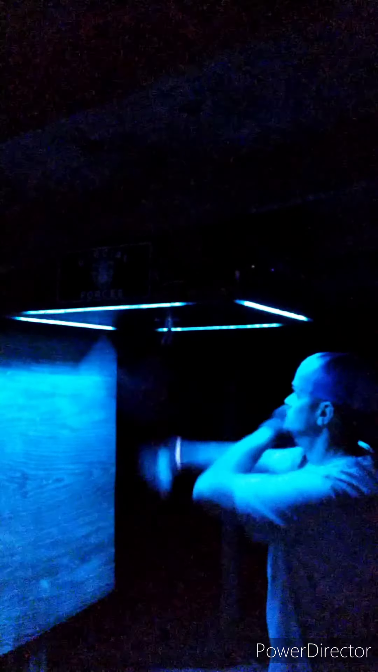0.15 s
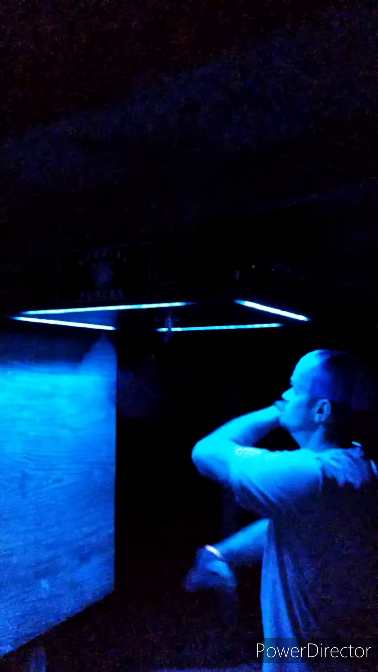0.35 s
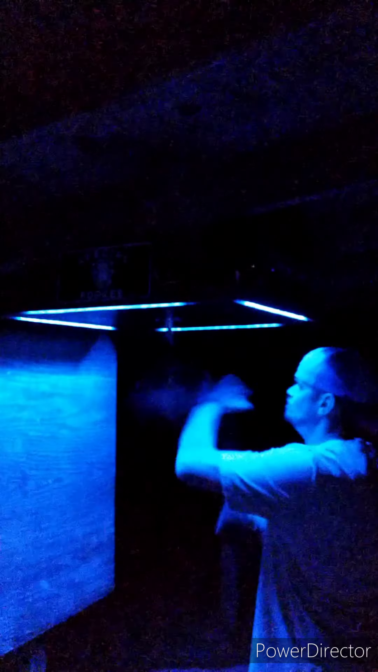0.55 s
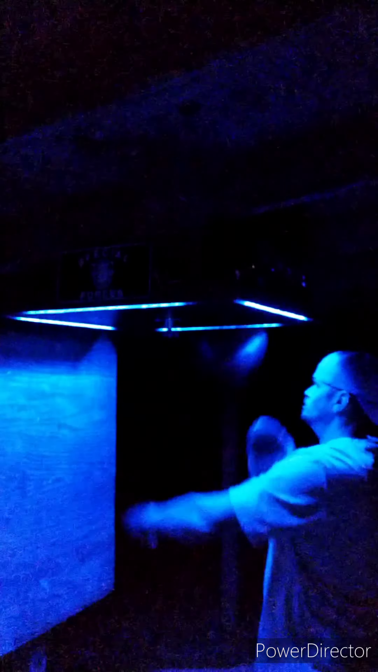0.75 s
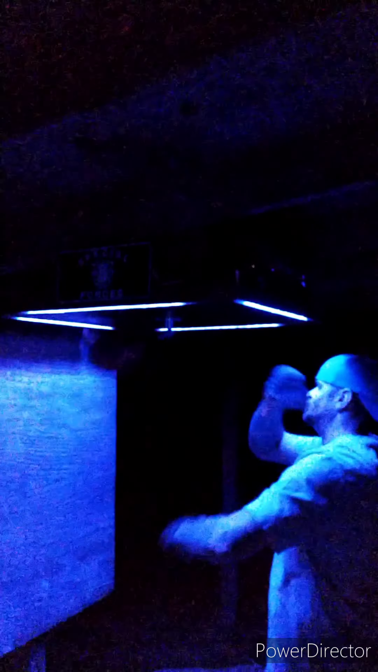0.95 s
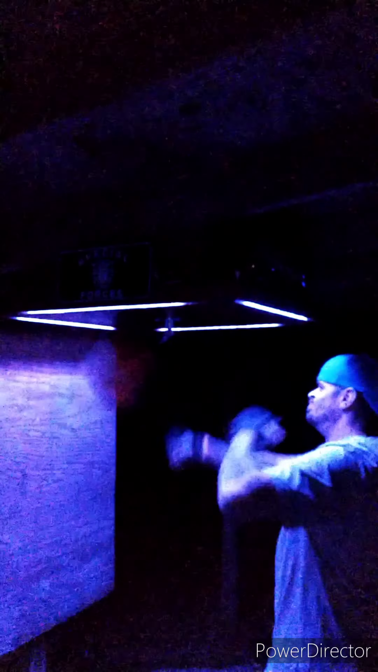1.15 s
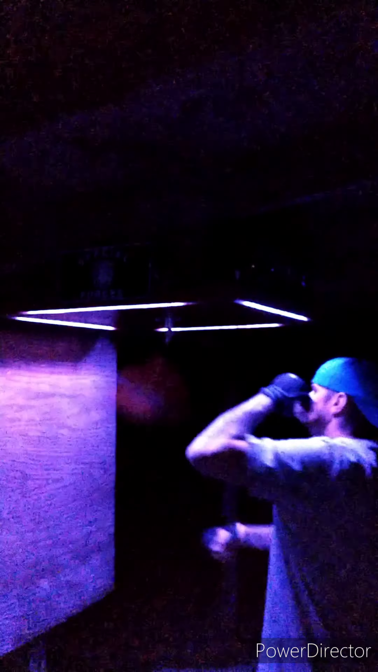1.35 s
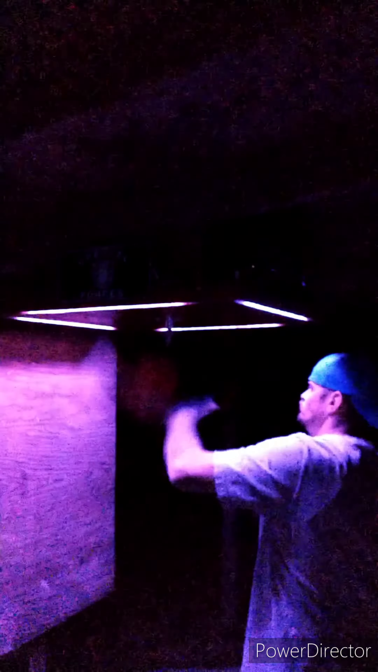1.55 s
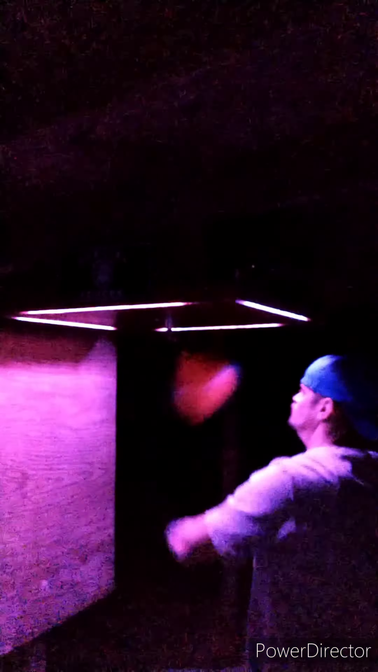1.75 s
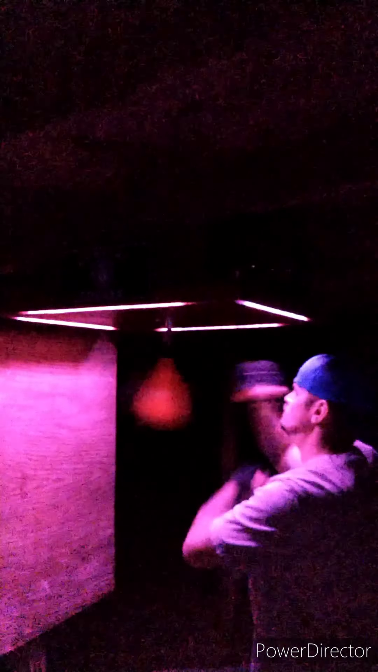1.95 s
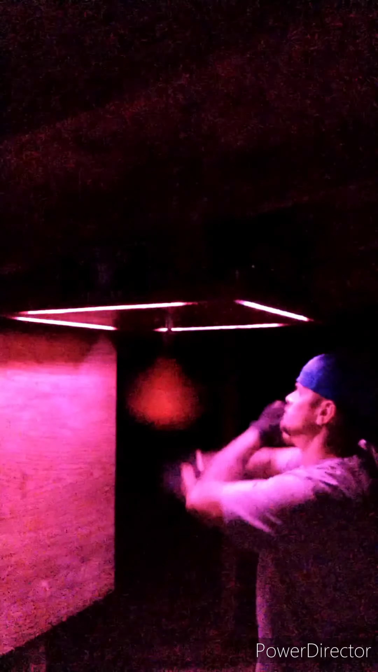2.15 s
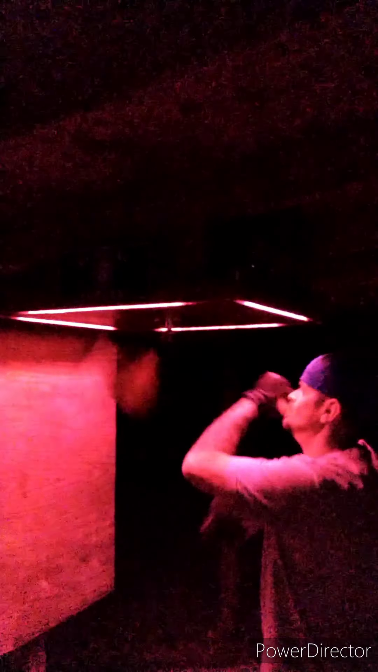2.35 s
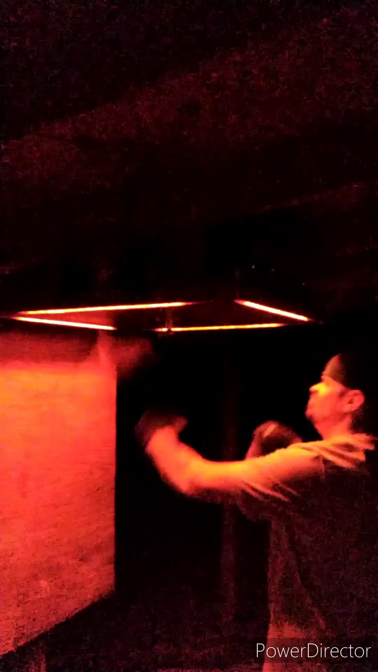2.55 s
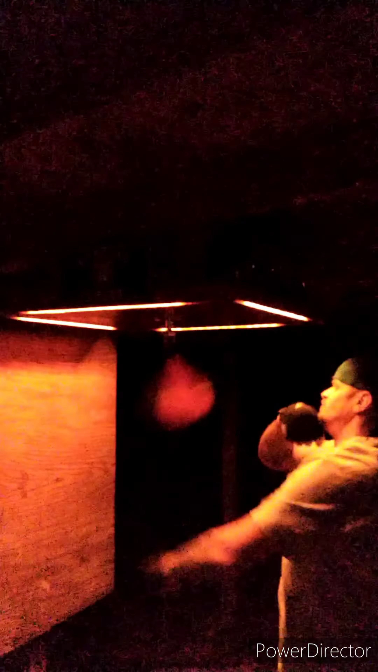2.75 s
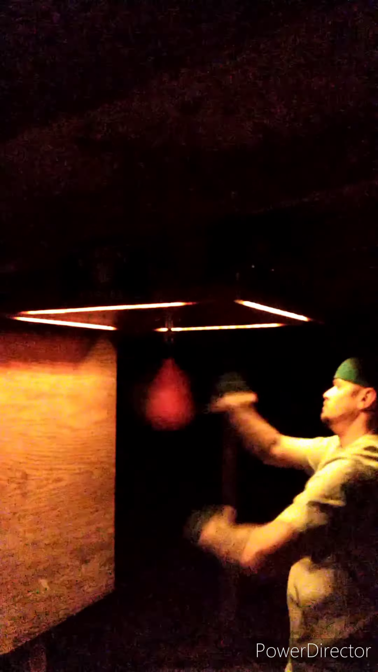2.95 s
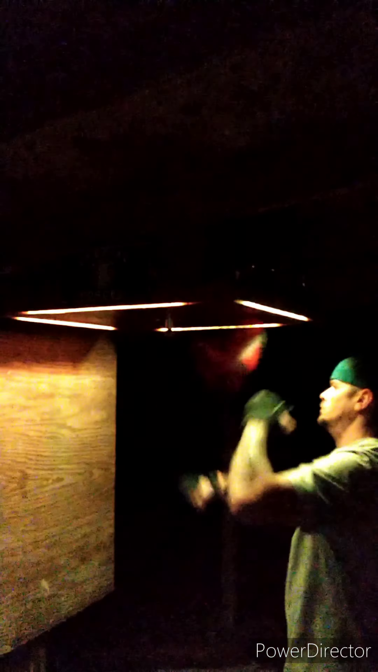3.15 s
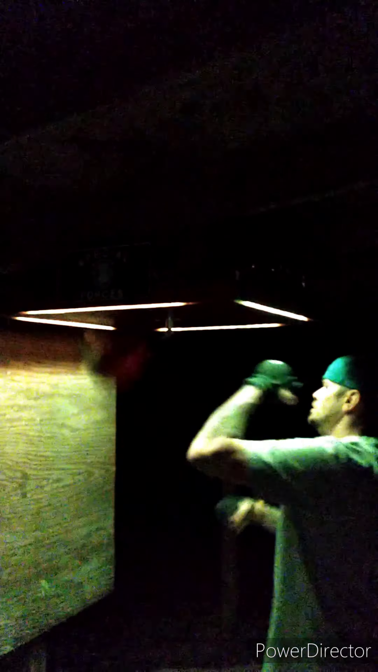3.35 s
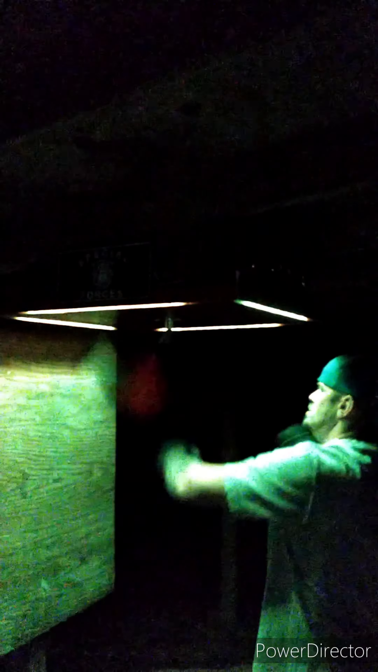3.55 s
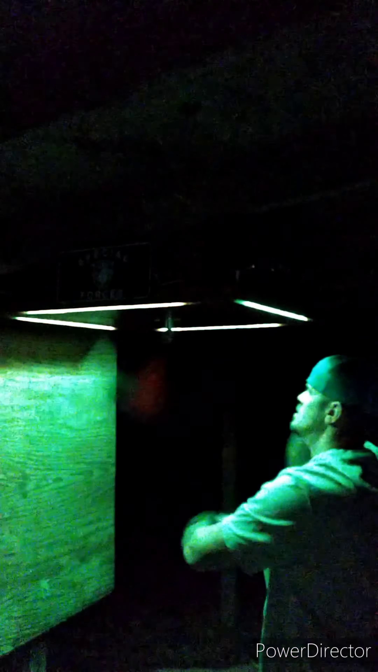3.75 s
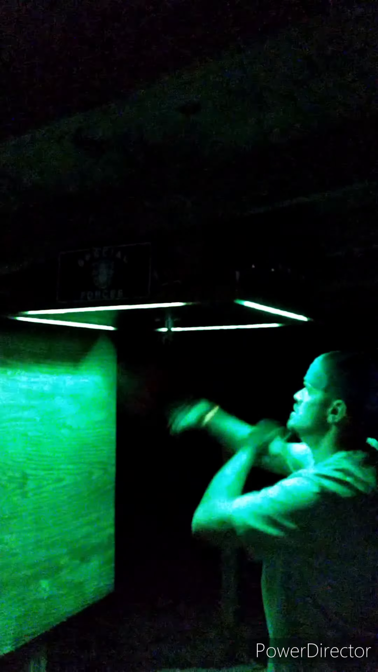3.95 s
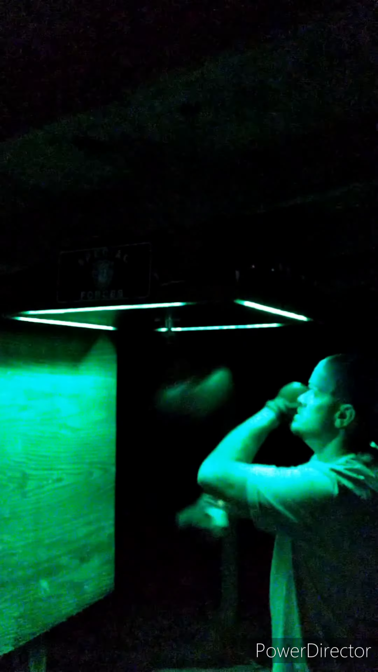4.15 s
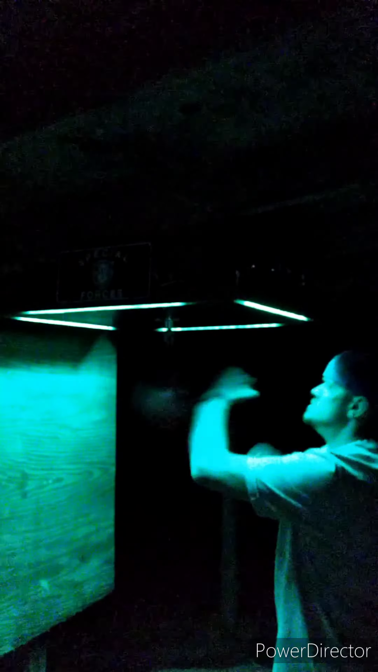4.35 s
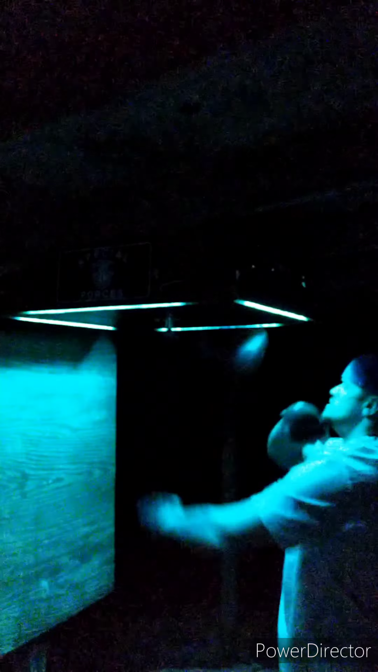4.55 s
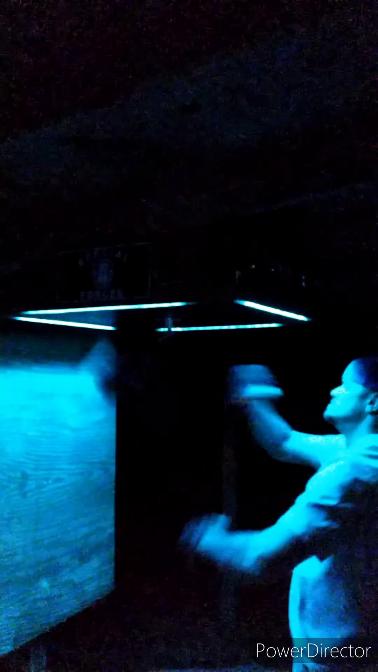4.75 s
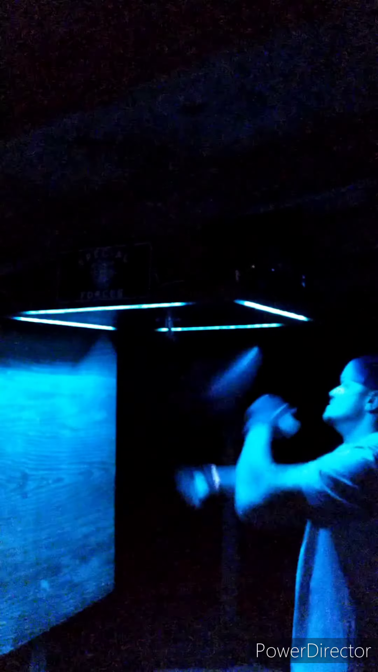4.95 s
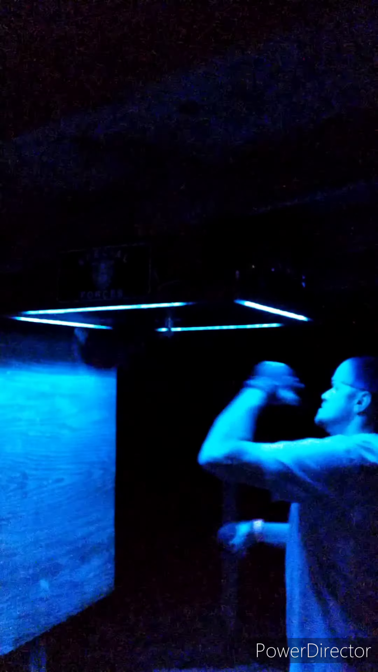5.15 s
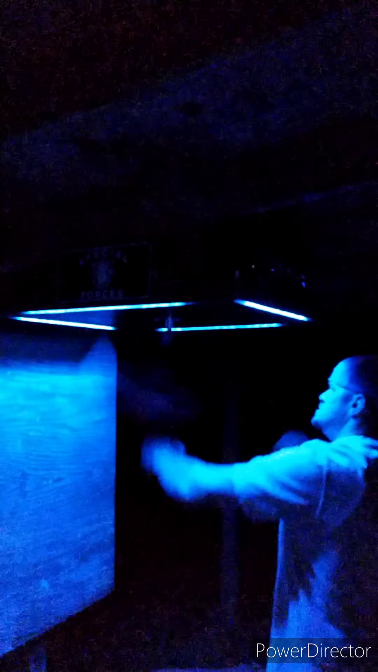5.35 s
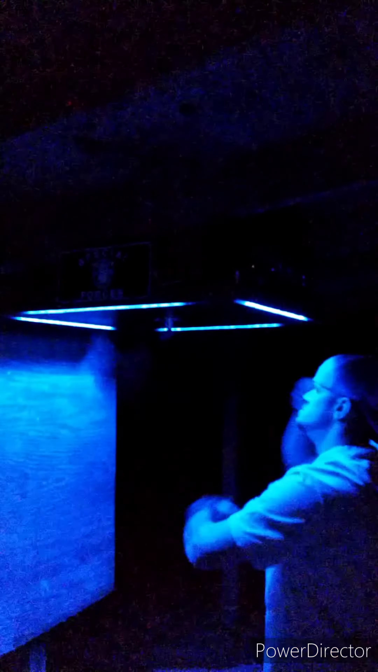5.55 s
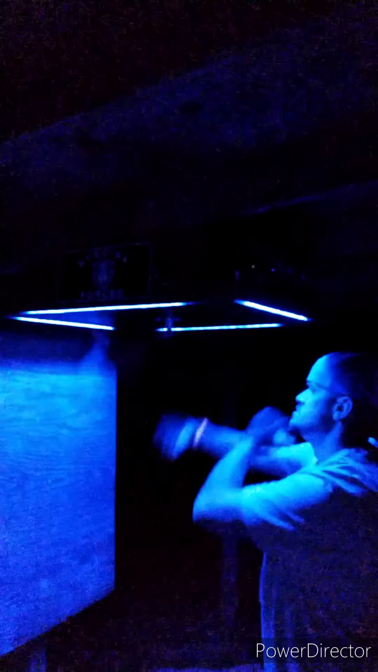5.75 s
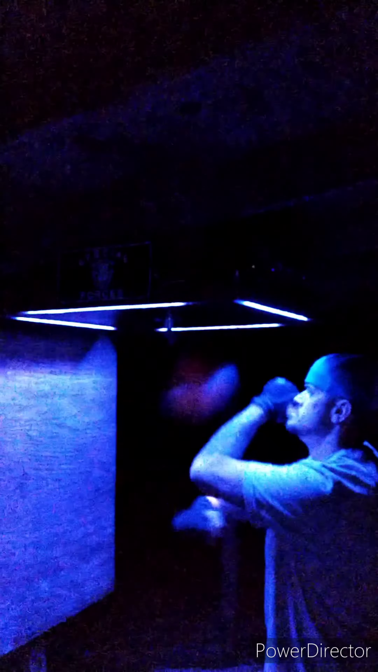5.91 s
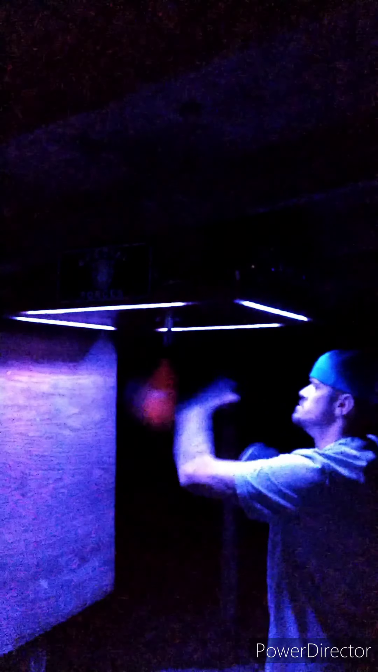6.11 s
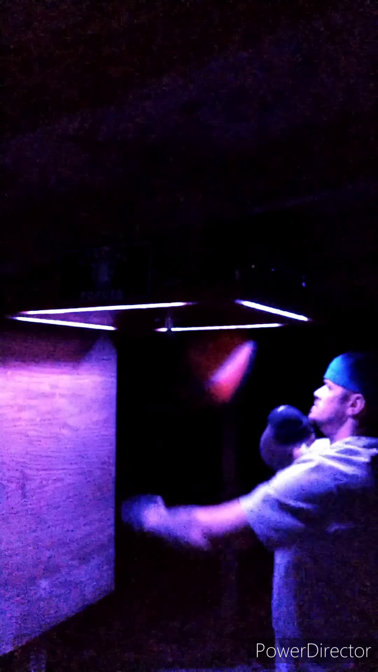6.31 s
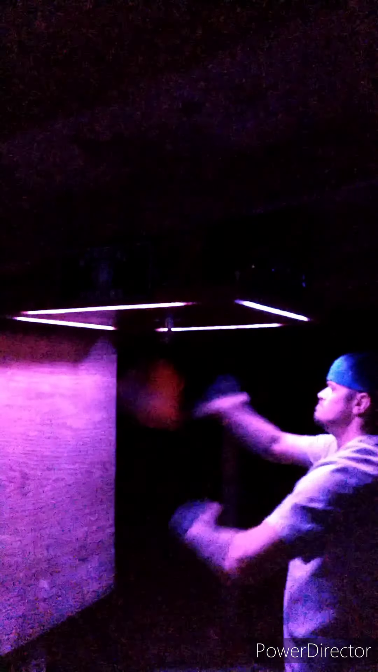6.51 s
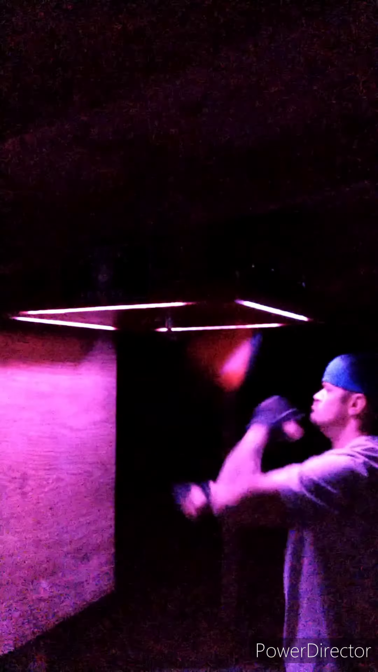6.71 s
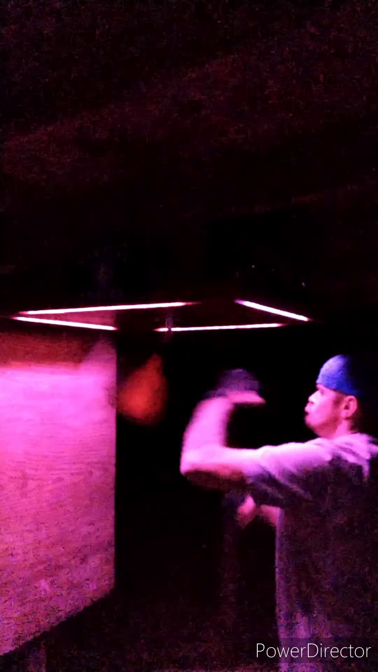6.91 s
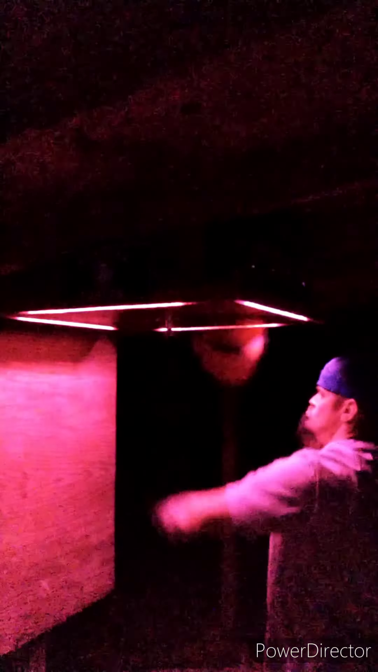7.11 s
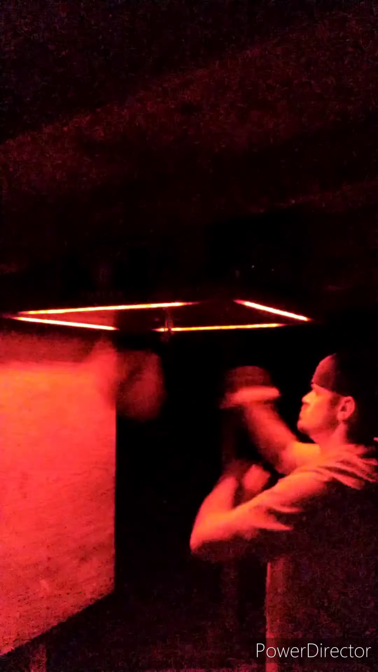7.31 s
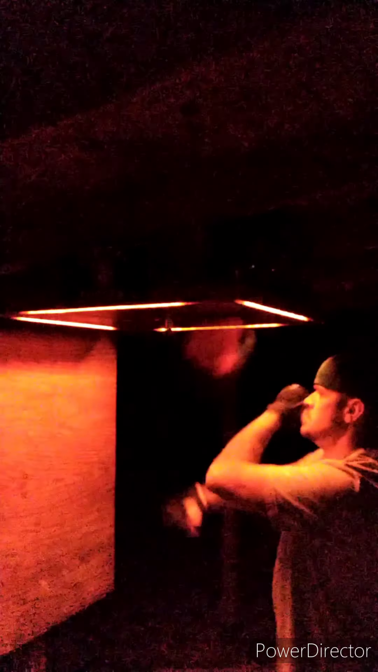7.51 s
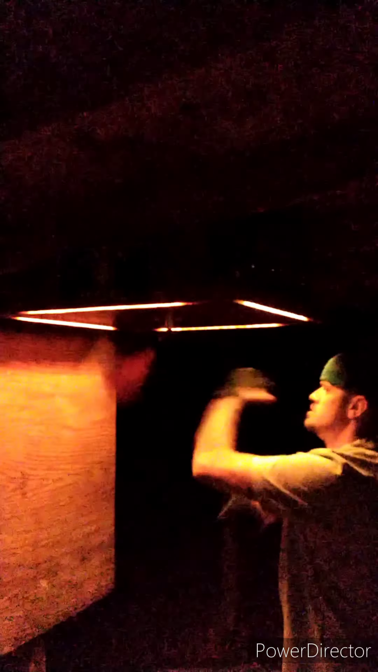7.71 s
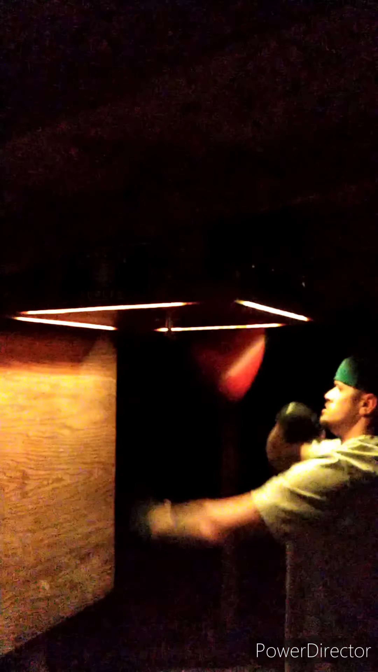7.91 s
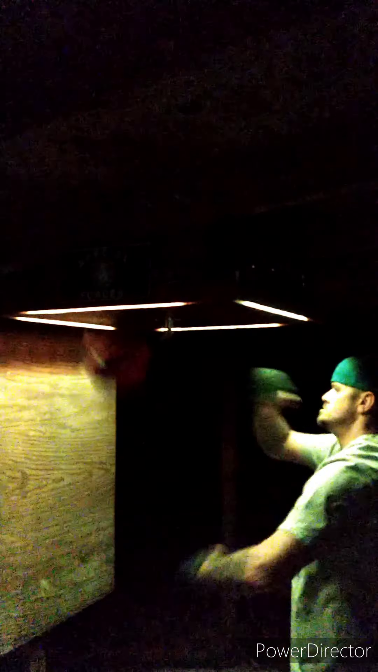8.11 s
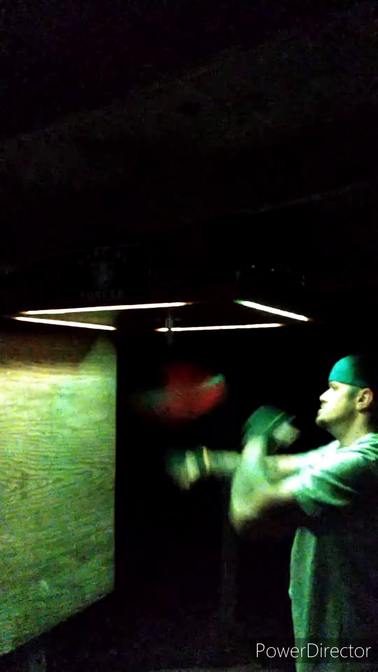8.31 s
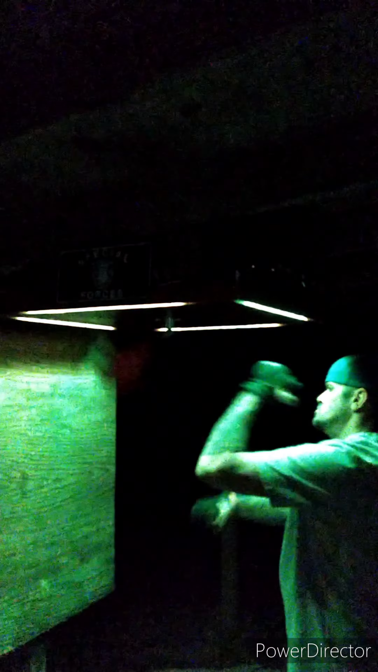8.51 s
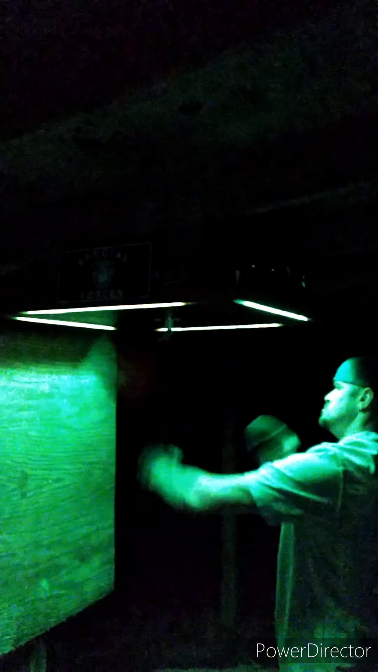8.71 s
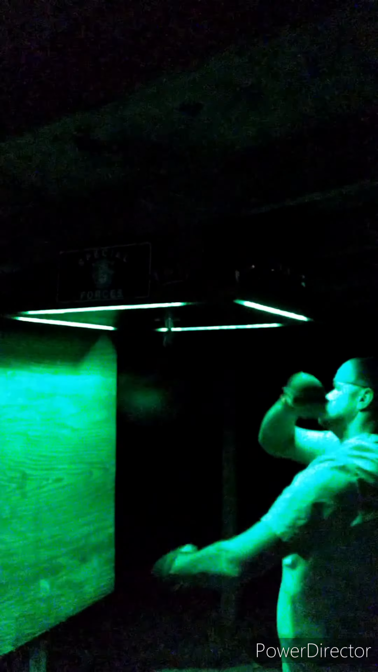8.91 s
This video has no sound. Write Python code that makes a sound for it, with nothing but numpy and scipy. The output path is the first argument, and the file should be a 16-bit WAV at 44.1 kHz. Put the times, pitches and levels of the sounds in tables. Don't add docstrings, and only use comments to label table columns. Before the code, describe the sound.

A speed bag is worked continuously for about nine seconds in a small basement room, close to a stereo microphone. A glove brushes leather at 0.23 s, then rebounds hit the board at 0.28, 0.41 and, weaker, 0.58 s. The first clear fist blow lands at 0.72 s, with a rebound just 0.07 s behind; two more follow at roughly 0.13-0.17 s spacing. This cycle repeats about every 0.48 s, tightening to about 0.42 s by 6 s, through 8.86 s. Blows are blunt, hollow slaps; first rebounds are loud with the brightest wooden crack; third rebounds are usually softer. The board booms low, and the steel swivel chatters between hits, notably at 1.8, 4.7, 6.8 and 7.7 s. Stronger glove brushes come at 7.4 and 8.7 s. A short dense room tail fills gaps over faint rumble and hiss; tiny high cricket trills appear near 2.4, 3.4, 3.9, 4.3 and 7.5 s.

```python
import sys
import numpy as np
from scipy import signal
from scipy.fft import rfft, irfft
from scipy.io import wavfile

SR = 44100
rng = np.random.default_rng(int(sys.argv[2]) if len(sys.argv) > 2 else 0)


def convert_level_to_amplitude(level_db):
    exponent = np.asarray(level_db, float) / 20
    return 10 ** exponent


def transcribe(u):
    v = np.clip(np.atleast_2d(u).T, -1, 1)
    q = np.round(v * 32767).astype(np.int16)
    wavfile.write(sys.argv[1], SR, q)


N = 395577

# f/Hz, density/dB per Hz
FLOOR_SPECTRUM = [(18, -37), (30, 9), (110, 5.5), (407, -11), (2670, -16.5), (3100, -23), (7270, -19),
                  (8240, -4), (12000, -23), (15600, -61), (22000, -120)]
FLOOR_RMS_DB = -67
# t/s, length/s, f/Hz, level/dB
CHIRPS = [
    (.012, 0.026, 7450, -84),
    (0.081, 0.067, 7450, -74),
    (2.34, 0.055, 7500, -61),
    (2.437, 0.1, 7390, -56.5),
    (2.602, 0.045, 7380, -62),
    (3.38, 0.084, 7380, -58),
    (3.88, 0.071, 7370, -59),
    (4.3, 0.11, 7450, -66),
    (7.504, 0.045, 7400, -56),
]

# t/s, slap peak/dB, slap pitch/Hz, crack/dB
BRUSHES = [
    (.229, -23.5, 1010, -51.5),
    (0.37, -23, 737, -42.5),
    (.514, -36, 780, -54),
    (1.074, -31, 651, -64),
    (6.128, -57, 654, -57),
    (7.377, -26, 1150, -42),
    (8.67, -24, 820, -46),
]
FIRST_REBOUNDS = [(.283, -6.5, 860, -30.5), (0.79, -4.5, 840, -28.5), (1.299, -5.5, 1020, -22.5),
                  (1.763, -7, 750, -25.5), (2.238, -7, 855, -24.5), (2.699, -6, 775, -23),
                  (3.181, -7.5, 750, -23.5), (3.668, -5.5, 936, -28), (4.133, -7, 820, -25),
                  (4.584, -6, 885, -22), (5.017, -4, 950, -30.5), (5.464, -7.5, 900, -24.5),
                  (5.91, -7, 785, -28.5), (6.342, -6.5, 880, -21.5), (6.751, -7.5, 850, -22.5),
                  (7.168, -7, 850, -20.5), (7.581, -4, 870, -25), (7.99, -5, 840, -28),
                  (8.422, -8.5, 870, -22), (8.864, -7.5, 910, -23.5)]
SECOND_REBOUNDS = [(.412, -10, 815, -36), (0.933, -9.5, 900, -32), (1.43, -9, 785, -29),
                   (1.884, -6.5, 930, -30.5), (2.369, -9, 850, -35), (2.832, -9, 980, -34.5),
                   (3.312, -7, 1040, -30), (3.795, -5.5, 930, -33.5), (4.254, -7.5, 970, -32),
                   (4.708, -9, 1130, -29), (5.145, -7, 1080, -28.5), (5.583, -8, 1060, -27),
                   (6.031, -10.5, 830, -32), (6.455, -10, 1030, -28.5), (6.866, -10, 940, -26),
                   (7.285, -9, 900, -28.5), (7.694, -8, 1010, -28.5), (8.109, -10.5, 810, -28.5),
                   (8.546, -9.5, 930, -31)]
THIRD_REBOUNDS = [(0.581, -20.5, 850, -49), (1.115, -14.5, 830, -45), (1.596, -14.5, 744, -45.5),
                  (2.04, -9, 830, -30), (2.54, -13.5, 885, -39.5), (2.998, -16, 890, -43),
                  (3.479, -12, 730, -39.5), (3.959, -8, 895, -30), (4.41, -12.5, 730, -42.5),
                  (4.867, -10, 790, -38.5), (5.306, -13, 870, -41.5), (5.735, -14, 920, -42),
                  (6.187, -10, 770, -30), (6.603, -14, 820, -43), (7.017, -12, 930, -39),
                  (7.434, -8.5, 820, -34), (7.848, -9, 830, -30), (8.261, -10, 830, -38),
                  (8.712, -10, 855, -32.5)]
BLOWS = [(.719, -7, 810, -38.5), (1.243, -6, 775, -38.5), (1.709, -6.5, 810, -40.5), (2.169, -4, 990, -37),
         (2.642, -8, 1110, -38.5), (3.121, -9.5, 870, -35), (3.605, -7, 910, -38.5),
         (4.077, -11.5, 920, -38), (4.525, -5, 1000, -39), (4.965, -6, 770, -39.5), (5.413, -4, 980, -31.5),
         (5.849, -5.5, 1170, -33), (6.291, -6, 840, -44), (6.701, -5.5, 870, -36),
         (7.119, -11.5, 640, -35.5), (7.532, -4.5, 935, -36.5), (7.941, -7.5, 840, -37),
         (8.37, -7.5, 980, -36), (8.812, -12.5, 850, -38.5)]
# boom/dB, share of slap swing in boom, body/dB, share of crack swing in body
KINDS = [
    (-22, 0.032, -26.5, 0.6),
    (-18.5, 0.05, -26.5, 0.24),
    (-22.5, .1, -26, 0.53),
    (-25, 0.18, -29.5, 0.36),
    (-30.5, 0.64, -39.5, 0.27),
]
SLAP_RISE_CYCLES = [0.72, 0.85, 0.83, 1.3, 0.77]
USUAL_SLAP_DB, USUAL_CRACK_DB = -8, -30
BLOW_GAP_S, BLOW_LATE_S = 0.078, 0.006

APPROACH_S, APPROACH_DB = 0.0068, 2.5
BAG_AIR_HZ, BAG_AIR_DB, BAG_AIR_T60_S = 1492, -26.5, 0.1
SWELL_POWER, PULL_CYCLES = 2.36, 0.25
# f/Hz, left/dB, right/dB, t60/s
BOARD_MODES = [(75.9, -10.5, -14, 0.62), (93.46, -6, -8.5, 0.52), (105.9, 5, 3, 0.15),
               (122.3, -17, -17.5, 0.63), (165.5, -33, -48, 0.4), (218.1, -15, -7, 0.44),
               (310.1, 1.5, -2, 0.19)]
# f/Hz, level/dB, t60/s
SWIVEL_MODES = [(2283, -3, .04), (2470, -4, .04), (2800, -4, .04), (3500, -2, .03), (3885, -3, .04),
                (4483, -2, .04), (5430, -5, .03), (5710, -4, .03)]
# t/s, peak/dB
RATTLES = [(0.6444, -45), (0.8794, -39), (1.047, -35), (1.389, -24), (1.525, -35), (1.836, -21),
           (1.9744, -35), (2.149, -29), (2.3294, -43), (2.7894, -42), (3.2685, -22.5), (3.4116, -30.5),
           (3.587, -44), (3.7465, -27.5), (3.897, -30), (4.2144, -25), (4.667, -18), (5.0993, -27),
           (5.243, -29), (5.5394, -38), (5.9863, -25.5), (6.4194, -20.5), (6.821, -19), (6.9686, -28),
           (7.248, -23), (7.6744, -17.5), (7.793, -34), (8.073, -27), (8.222, -27), (8.509, -22)]
WINDUP_S, WINDUP_DB = 0.019, -45.5

# delay/s, left/dB, right/dB
ECHOES = [(.0043, -2, -8), (.0062, -23, -7.5), (.0092, -7.5, -24), (0.0145, -17, -14)]
# f/Hz, density/dB per Hz
TAIL_COLOUR = [(21, -48), (35, 0.5), (98, 5), (185, -7.5), (309, -4.5), (399, -11), (955, -3.5),
               (1640, -20.5), (2530, -18.5), (3270, -23), (3810, -21), (5590, -19), (9830, -40.5),
               (14400, -43.5), (16000, -49)]
# f/Hz, t60/s
TAIL_T60 = [(40, 0.44), (150, 0.59), (500, 0.36), (1200, 0.23), (3000, 0.24), (8000, 0.16), (15000, 0.56)]
# f/Hz, left minus right/dB
TAIL_TILT = [(60, -4), (110, 7.5), (200, -1.5), (380, 3), (700, -1.5), (1290, -1.5), (2380, 2.5),
             (4400, -3), (8120, -1.5), (15000, -2.5)]
KNEE_S = 0.042
# f/Hz, fall/dB per s
KNEE_FALL = [(500, -16), (2000, -14), (6000, 129), (15000, 208)]

PORT_LAG_S = 0.00024
# f/Hz, phase/rad
PORT_PHASE = [(0, 0), (430, -.1), (1700, 3.1), (2400, 6.3), (3250, 9.4), (4310, 12.6), (4910, 15.7),
              (6000, 18.8), (10000, 28), (22050, 60)]
# f/Hz, share
PORT_SHARE = [(100, 1), (600, 0.62), (1700, 0.66), (2700, 0.75), (3250, 1), (3800, 0.5), (6000, 0.06),
              (15000, 0.87)]
# f/Hz, width/Hz, left/dB, right/dB
PORT_PEAKS = [(1500, 250, -30, -3), (5650, 500, -16, 2), (10600, 900, -6, -30)]


def at_hz(points, hz):
    table_hz, value = np.transpose(points)
    return np.interp(np.log(hz), np.log(table_hz), value)


def butter(order, hz, kind="low"):
    return signal.butter(order, hz, kind, fs=SR, output="sos")


def bands(low_hz, count):
    edges = low_hz * 2 ** (np.arange(count + 1) / 2)
    return [(np.sqrt(a * b), butter(2, [a, b], "band")) for a, b in zip(edges, edges[1:])]


def smooth(x, *times_s):
    for time_s in times_s:
        r = np.exp(-1 / (time_s * SR))
        x = signal.lfilter([1 - r], [1, -r], x)
    return x


def later(x, delay_s):
    n = max(int(round(delay_s * SR)), 1)
    return np.concatenate([np.zeros(n), x[:-n]])


def ring(clicks, hz, t60_s):
    r, w = convert_level_to_amplitude(-60 / (t60_s * SR)), 2 * np.pi * hz / SR
    return signal.lfilter([0, np.sin(w)], [1, -2 * r * np.cos(w), r * r], clicks)


def hits():
    tables = [BLOWS, FIRST_REBOUNDS, SECOND_REBOUNDS, THIRD_REBOUNDS, BRUSHES]
    rows = []
    for table, rise, (boom_db, boom_share, body_db, body_share) in zip(tables, SLAP_RISE_CYCLES, KINDS):
        for s, slap_db, hz, crack_db in table:
            boom = boom_db + boom_share * (slap_db - USUAL_SLAP_DB)
            body = body_db + body_share * (crack_db - USUAL_CRACK_DB)
            rows.append((s, slap_db, hz, boom, body, crack_db, rise))
    return np.array(sorted(rows))


def latest_hit():
    return np.searchsorted(hits()[1:, 0] * SR, np.arange(N))


def blow_delay():
    return BLOW_LATE_S * (np.diff(hits()[:, 0], append=99) < BLOW_GAP_S)


def strikes(levels_db, late_s=0.0, events=None):
    out = np.full(N, 1e-18)
    at = ((np.array(events or hits())[:, 0] + late_s) * SR).astype(int)
    out[np.minimum(at, N - 1)] = convert_level_to_amplitude(levels_db)
    return out


def port_noise():
    common, own = rfft(rng.standard_normal((2, 2, N)))
    hz = np.fft.rfftfreq(N, 1 / SR) + 1
    share = np.clip(at_hz(PORT_SHARE, hz), 0, 1)
    turn = np.exp(-1j * np.interp(hz, *np.transpose(PORT_PHASE)))
    right = share * common * turn + np.sqrt(1 - share ** 2) * own
    return np.moveaxis(irfft(np.array([common, right]), N), 0, 1)


def floor():
    white = rng.standard_normal((2, 3, N))
    out = np.zeros((3, N))
    for k, (hz, sos) in enumerate(bands(31.4, count=16)):
        out += convert_level_to_amplitude(at_hz(FLOOR_SPECTRUM, hz)) * signal.sosfilt(sos, white[k % 2])
    out = out[0] + 1.1 * out[1:]
    return convert_level_to_amplitude(FLOOR_RMS_DB) * out / out.std()


def cricket():
    out, t = np.zeros(N), np.arange(N) / SR
    rough = smooth(rng.standard_normal((2, N)), 0.0019, 0.0019)
    rough /= rough.std()
    for s, length_s, hz, level_db in CHIRPS:
        on = np.clip(np.minimum((t - s) / 0.002, (s + length_s - t) / 0.025), 0, 1)
        phase = 2 * np.pi * hz * t
        whistle = (1 + 0.74 * rough[0]) * np.sin(phase) + 0.9 * rough[1] * np.cos(phase)
        out += convert_level_to_amplitude(level_db) * on * whistle
    return out * convert_level_to_amplitude([[1.5], [-1.5]])


def bag_air(slap_db, boom_db):
    push = smooth(strikes(boom_db + APPROACH_DB, -APPROACH_S), 0.0041, 0.0041) * 0.0075 * SR
    inside = ring(strikes(slap_db + BAG_AIR_DB, 0.00197), BAG_AIR_HZ, BAG_AIR_T60_S)
    return push + inside * convert_level_to_amplitude([[-3], [3]])


def slap(left_db, right_db, push_db):
    span = 800
    wave, pull, t = np.zeros(N + span), np.zeros(N + span), np.arange(span) / SR
    for s, peak_db, hz, *_, rise in hits():
        at = int((s + 0.0006) * SR)
        cycles = 1.07 * hz * t
        swell = (cycles / rise * np.exp(1 - cycles / rise)) ** SWELL_POWER
        contact = cycles / PULL_CYCLES * np.exp(1 - cycles / PULL_CYCLES)
        wave[at:at + span] -= convert_level_to_amplitude(peak_db) * swell * np.sin(2 * np.pi * cycles)
        pull[at:at + span] -= convert_level_to_amplitude(peak_db + push_db) * contact
    wave, pull = wave[:N], pull[:N]
    left = convert_level_to_amplitude(left_db) * wave + pull
    right = convert_level_to_amplitude(right_db) * wave + 0.39 * pull
    return np.array([left, later(right, PORT_LAG_S)])


def crack(body_db, crack_db, noise):
    contact = strikes(0, blow_delay() + 0.00032) + convert_level_to_amplitude(0.5) * strikes(0, 0.0001)
    white = noise * smooth(contact, 0.00043, 0.0017) * 0.0011 * SR
    body = signal.sosfilt(butter(2, [1400, 3200], "band"), white)
    softened = smooth(white, 0.00002, 0.00002) + 0.013 * white
    bright = signal.sosfilt(butter(2, 3500, "high"), softened)
    hit = latest_hit()
    return body * convert_level_to_amplitude(body_db + 23.0)[hit] + bright * convert_level_to_amplitude(crack_db + 16.5)[hit] * convert_level_to_amplitude([[2.5], [-2.5]])


def board(boom_db):
    chance = rng.normal(0, 1, (len(boom_db), len(BOARD_MODES)))
    out = np.zeros((2, N))
    for k, (hz, left_db, right_db, t60_s) in enumerate(BOARD_MODES):
        mode = ring(strikes(boom_db + 3 + 2.74 * chance[:, k], late_s=0.001), hz, t60_s)
        speed = np.diff(mode, prepend=0) * SR / (2 * np.pi * hz)
        out -= convert_level_to_amplitude([[left_db], [right_db]]) * smooth(speed, 0.00072, 0.00058)
    return out


def swivel(crack_db, noise):
    jolt = smooth(strikes(crack_db, blow_delay() + 0.00012), 0.0078) * 0.061 * SR
    rattles = list(RATTLES) + [(s - WINDUP_S, WINDUP_DB) for s, *_ in BLOWS]
    rattle_db = np.array(rattles)[:, 1]
    swing = smooth(strikes(rattle_db + 6, events=rattles), 0.0022, 0.025) * 0.007 * SR
    out = np.zeros((2, N))
    for hz, level_db, t60_s in SWIVEL_MODES:
        clicks = (rng.random((2, N)) < 300 / SR) * rng.standard_normal((2, N))
        out += ring(clicks * (jolt + swing) * convert_level_to_amplitude(level_db - 14) + 1e-18, hz, t60_s)
    scrape = signal.sosfilt(butter(4, [900, 6300], "band"), noise)
    return out + convert_level_to_amplitude(2.5) * scrape * swing


def near_echoes(x):
    left, right = signal.sosfilt(butter(1, 9000), x)
    out = np.zeros((2, N))
    for s, left_db, right_db in ECHOES:
        out += [convert_level_to_amplitude(left_db) * later(left, s), convert_level_to_amplitude(right_db) * later(right, s)]
    return out


def tail(slap_db, body_db, crack_db):
    noise = port_noise()
    starts = hits()[:, 0]
    since_s = np.arange(N) / SR - starts[latest_hit()]
    past_knee_s = np.clip(since_s - KNEE_S, 0, 0.05)
    flutter = smooth(rng.standard_normal((2, N)), 0.0016, 0.0016)
    noise = noise * convert_level_to_amplitude(2.58 * flutter / flutter.std())
    chance = rng.normal(0, 1, (len(starts), 18))
    out = np.zeros((2, N))
    for k, (hz, sos) in enumerate(bands(39.45, count=17) + [(14500, butter(2, 13600, "high"))]):
        if hz < 150:
            feed_db = slap_db - 22
        elif hz < 1300:
            feed_db = slap_db - 17.5
        elif hz < 3300:
            feed_db = body_db + 10.5
        else:
            feed_db = crack_db + 12.0
        decay_s = at_hz(TAIL_T60, hz) / np.log(1e6)
        late_s = 0.00134 + (hz > 1300) * blow_delay()
        feed = strikes(2 * (feed_db + 2.0 * chance[:, k]), late_s)
        power = smooth(feed, 0.00022, decay_s) * decay_s * SR
        power *= convert_level_to_amplitude(-2 * np.clip(at_hz(KNEE_FALL, hz), 0, 600) * past_knee_s)
        tilt_db = at_hz(TAIL_TILT, hz) / 2
        gain = convert_level_to_amplitude(at_hz(TAIL_COLOUR, hz) + 20.5) * convert_level_to_amplitude([[tilt_db], [-tilt_db]])
        out += gain * np.sqrt(power) * signal.sosfilt(sos, noise[k % 2])
    return out


def scene():
    _, slap_db, _, boom_db, body_db, crack_db, _ = hits().T
    snap_noise, scrape_noise = port_noise()
    background = floor() + cricket()
    thud = slap(left_db=-0.5, right_db=3.5, push_db=-6.0)
    snap = crack(body_db, crack_db, snap_noise)
    direct = bag_air(slap_db, boom_db) + thud + snap
    struck = board(boom_db) + swivel(crack_db, scrape_noise)
    room = near_echoes(convert_level_to_amplitude(-23) * thud + snap) + tail(slap_db, body_db, crack_db)
    return background + direct + struck + room


def top_cut(x):
    return signal.sosfilt(signal.butter(12, 16700, fs=SR, output="sos"), x)


def record(dry):
    heard = dry
    for hz, width_hz, left_db, right_db in PORT_PEAKS:
        r, w = np.exp(-np.pi * width_hz / SR), 2 * np.pi * hz / SR
        peak = signal.lfilter([(1 - r * r) / 2, 0, (r * r - 1) / 2], [1, -2 * r * np.cos(w), r * r], dry)
        heard = heard + convert_level_to_amplitude([[left_db], [right_db]]) * peak
    heard = signal.sosfilt(butter(2, 55, "high"), heard)
    heard = signal.sosfilt(signal.cheby2(10, 30, 16500, fs=SR, output="sos"), heard)
    mix = np.clip(1.219 * np.tanh(heard / 1.273), -1, 1)
    return top_cut(mix)


dry = scene()
out = record(dry)
transcribe(out)
```